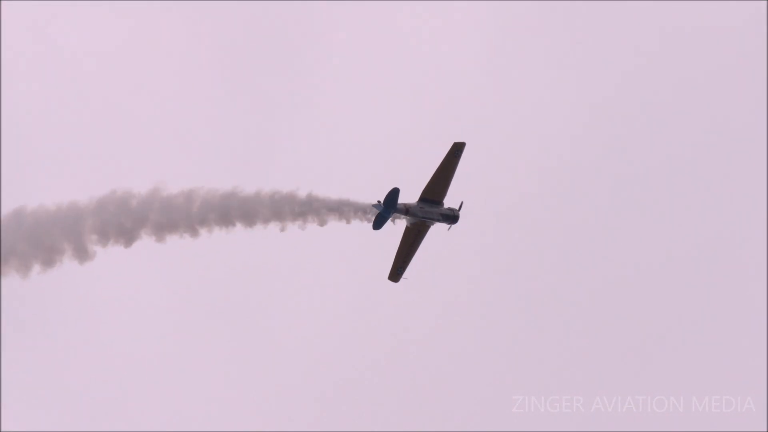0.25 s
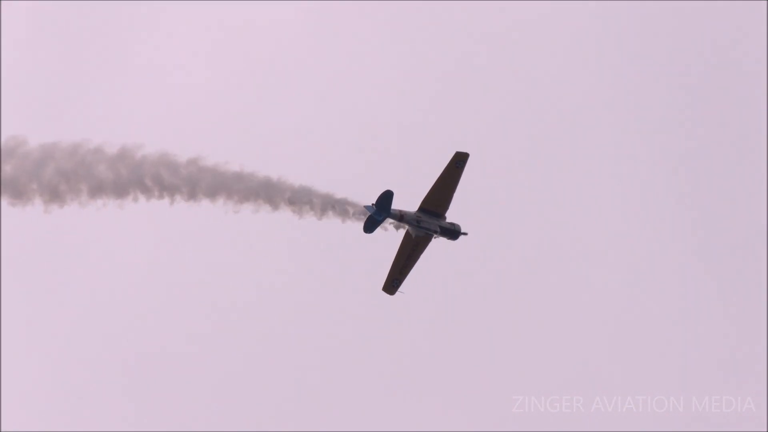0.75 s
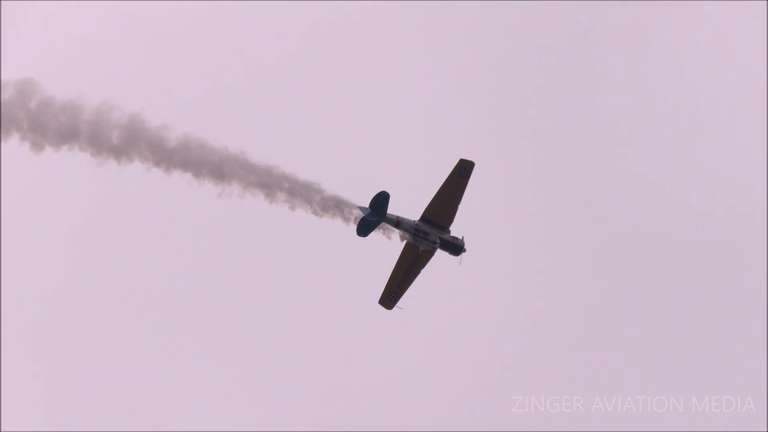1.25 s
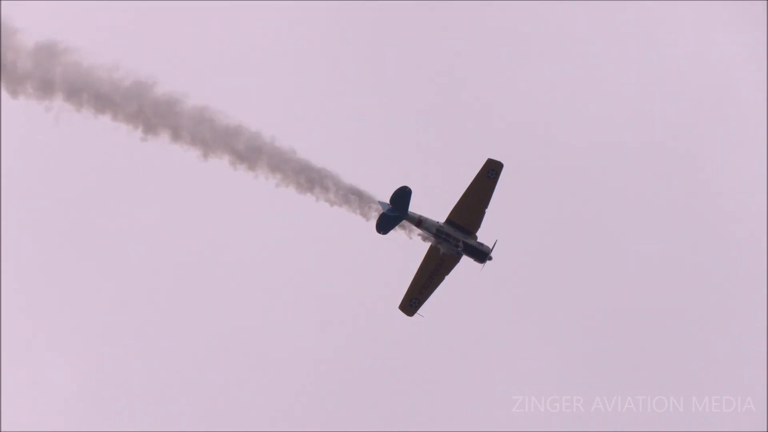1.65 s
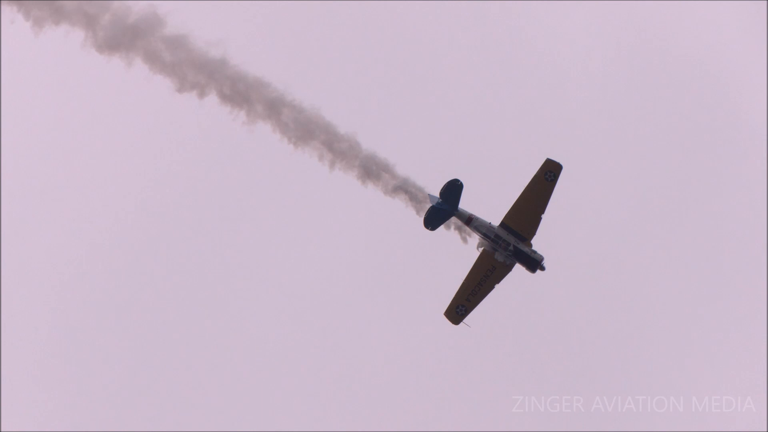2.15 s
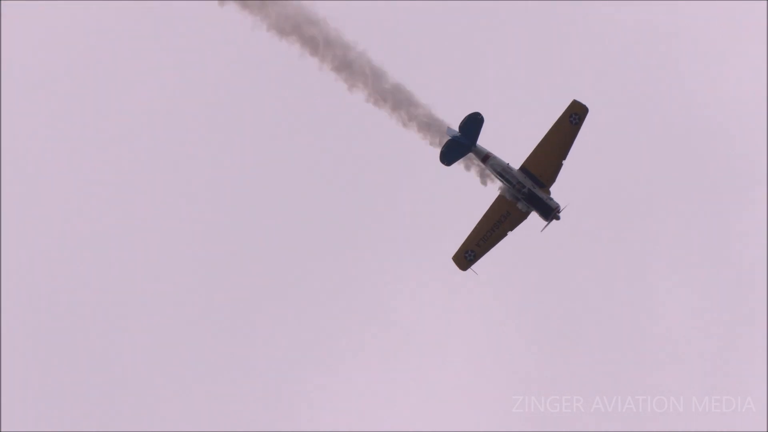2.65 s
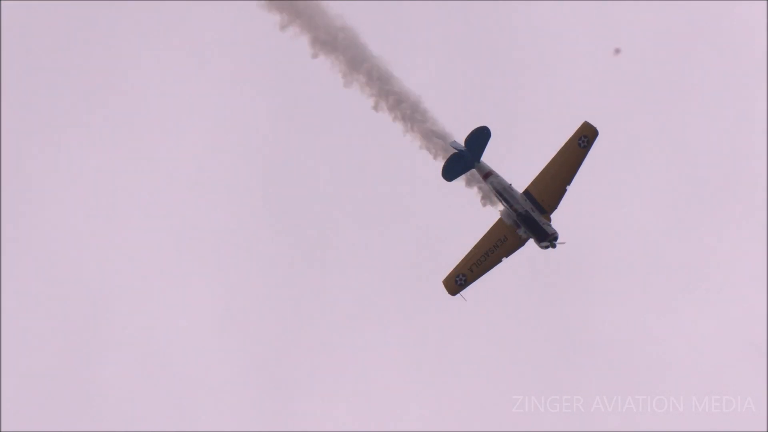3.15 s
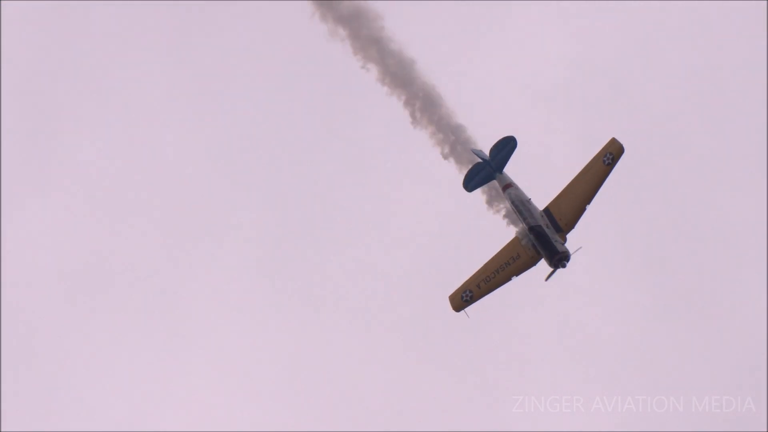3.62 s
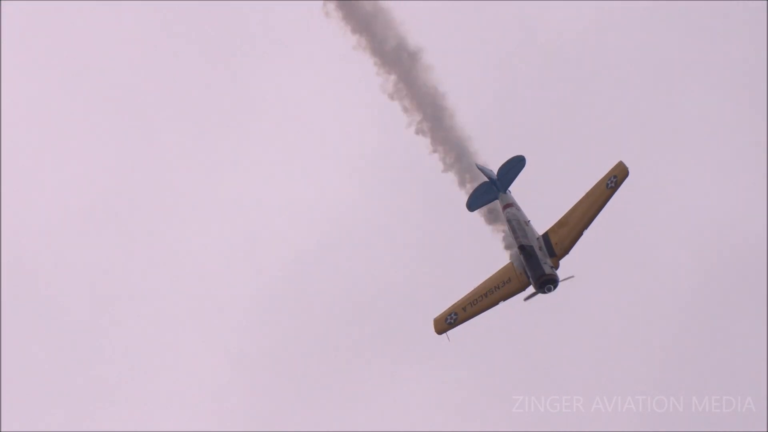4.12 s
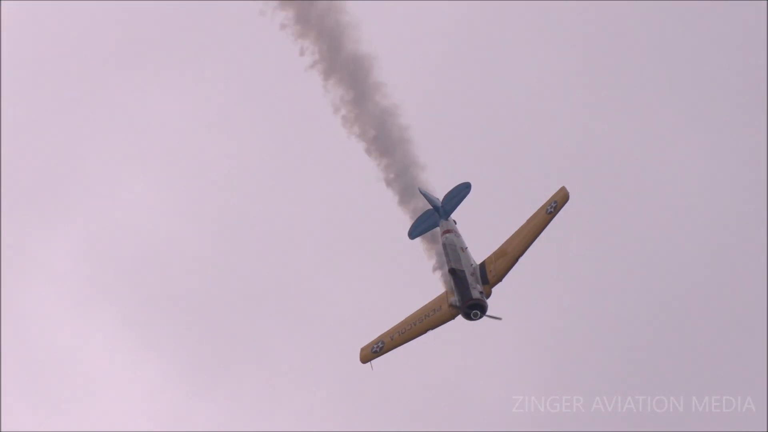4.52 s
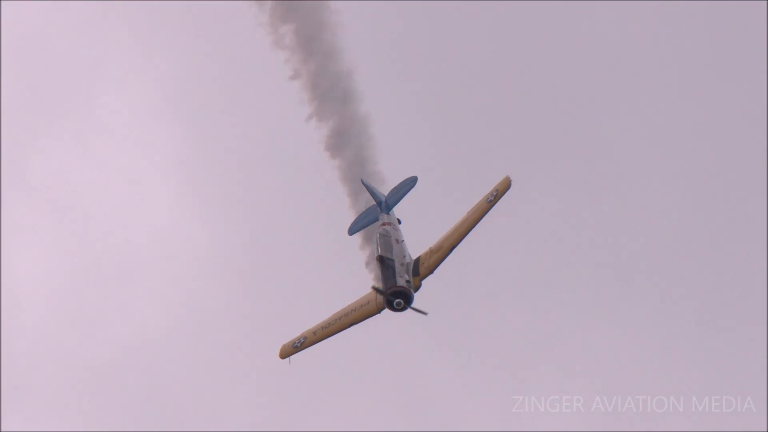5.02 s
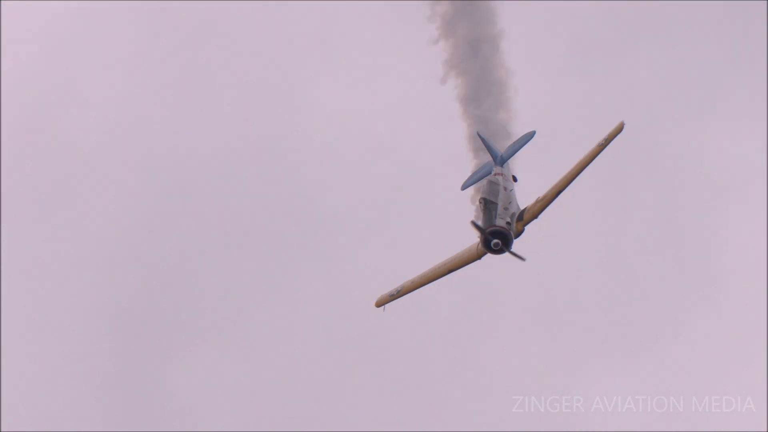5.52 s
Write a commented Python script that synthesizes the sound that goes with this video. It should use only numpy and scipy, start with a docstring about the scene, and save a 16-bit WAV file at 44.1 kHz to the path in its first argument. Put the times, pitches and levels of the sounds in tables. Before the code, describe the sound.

A single-engine propeller aircraft passes over a grass field. A few soft low thumps open over throbbing exhaust, then an airy, snarling whoosh swells and sinks. A deep hum builds, and the propeller takes over with fast, increasingly sharp cracks, loudest past the middle, slowly rising in pitch. Faint insects trill and microphones hiss underneath. Distant outdoor stereo pickup with thin deep bass and softened top treble.

```python
"""An aircraft's exhaust throbs first, over a few low thumps, trilling insects in the grass and microphone hiss.
The aircraft, with nine cylinders in a ring and a two-blade propeller, banks and dives towards a listener on a
grass airfield. Tones, filtered noise and puffs make the exhaust. As the propeller disc turns edge-on, the blade
tips crack in pairs: a steep pulse through the air, then another off the ground."""
import sys
import numpy as np
from scipy import signal
from scipy.fft import rfft, irfft, next_fast_len
from scipy.io import wavfile
from scipy.ndimage import uniform_filter1d, map_coordinates

SR = 44100
rng = np.random.default_rng(int(sys.argv[2]) if len(sys.argv) > 2 else 0)


def bounce(signal):
    """Save signal as a 16-bit WAV file at the path given by the first command-line argument."""
    frames = np.transpose(np.atleast_2d(signal))
    limited = np.clip(frames, -1, 1)
    pcm = np.round(limited * 32767).astype(np.int16)
    wavfile.write(sys.argv[1], SR, pcm)


N = 254581


def amp(db):
    """Turn decibels into a plain multiplier."""
    return np.exp(np.asarray(db) * (np.log(10) / 20))


def unit(x):
    """Scale a signal to an rms of 1."""
    return x / np.sqrt(np.mean(x ** 2) + 1e-20)


def curves(rows):
    """One value per sample for each column after the time."""
    s, *cols = np.transpose(rows)
    return [np.interp(np.arange(N) / SR, s, c) for c in cols]


def since(at_s):
    """Seconds after a moment, 0 before it."""
    return np.clip(np.arange(N) / SR - at_s, 0, None)


def swell(at_s, width_s):
    """A bell of height 1 in time."""
    return np.exp(-((np.arange(N) / SR - at_s) / width_s) ** 2)


def turn_on(at_s, rise_s):
    """A smooth step from 0 to 1."""
    return .5 + .5 * np.tanh((np.arange(N) / SR - at_s) / rise_s)


def wobble(rate):
    """A smooth random curve, rate knots a second."""
    coarse = np.arange(0, N + 64, 64)
    knots = rng.standard_normal(int(N * rate / SR) + 4)
    return np.interp(np.arange(N), coarse, map_coordinates(knots, [coarse * rate / SR]))


def filtered(x, response):
    """x times a complex response of frequency."""
    m = next_fast_len(N + SR // 2)
    return irfft(rfft(x, m) * response(np.fft.rfftfreq(m, 1 / SR)), m)[..., :N]


def band(hz, centre_hz, width_hz):
    """One causal resonance."""
    return 1j * hz * width_hz / (centre_hz ** 2 - hz ** 2 + 1j * hz * width_hz)


def noise(spectrum, patchy_db, channels=1):
    """Coloured noise of rms 1 with patches of random gain."""
    z = signal.stft(rng.standard_normal((channels, N)), nperseg=512)[2]
    field = uniform_filter1d(rng.standard_normal(z.shape[1:]), 6, 0)
    field = uniform_filter1d(field, 14, 1)
    patchy = signal.istft(z * amp(patchy_db * unit(field)), nperseg=512)[1][:, :N]
    f, db = np.transpose(spectrum)
    return unit(filtered(patchy, lambda hz: amp(np.interp(np.log(hz + 1), np.log(f), db))))


# How fast the blades pass, as heard. Each row: time in seconds, blade passes per second in Hz.
BLADE_RATE = [(0.0, 62.08), (0.4, 62.43), (0.8, 62.92), (1.2, 63.65), (1.6, 64.18), (2.0, 64.9),
              (2.4, 65.81), (2.8, 66.64), (3.2, 67.36), (3.6, 68.16), (4.0, 69.25), (4.4, 70.41),
              (4.8, 71.71), (5.2, 73.09), (5.77, 75.3)]


def blade_passes():
    """The pitch curve in Hz, and the running count of blade passes, which sets every repeating sound."""
    rate, = curves(BLADE_RATE)
    return rate, np.cumsum(rate) / SR


# Loudness of the low sounds. Each row: time in seconds, then the levels in dB of the thrust hum,
# the firing tone, the throb and the rumble.
LOW_LEVELS = [(0, -43.5, -33.5, -38.5, -35), (.45, -41, -53, -33.5, -30), (1.3, -32, -46, -31.5, -32),
              (2.0, -31, -42, -32, -34.5), (2.6, -28, -43.5, -27.5, -31.5), (3.0, -30.5, -39, -27, -35),
              (3.55, -29.5, -52, -27, -33), (4.1, -44, -51.5, -31, -36), (4.55, -56, -41, -47, -37),
              (5.1, -48, -54, -44, -30.5), (5.45, -40.5, -34, -39.5, -33.5), (5.77, -41, -39, -30.5, -29)]


def low_levels():
    """Levels of the low sounds, as curves in dB."""
    return curves(LOW_LEVELS)


CYCLE_MS = 62.5  # nominal engine cycle: lags in ms are counted as shares of it, so they shrink as the engine quickens

# The cylinders in firing order. Each row: lag of the puff in the collector ring in nominal ms, strength in dB.
CYLINDERS = [(-3.7, -1), (-3.3, -4), (-1.6, -2), (-6.4, -1.5), (-1.1, -4), (-3.1, -6), (1.3, -3), (5, -5),
             (5.1, 0)]


def puff_maker(cycle):
    """Nine puffs every cycle (two turns), unevenly spaced by the collector ring, each a click to be filtered."""
    lag, db = np.transpose(CYLINDERS)
    cycle_numbers = np.arange(-1, int(cycle[-1]) + 1)[:, None]
    fired = cycle_numbers + np.arange(9) / 9 + lag / CYCLE_MS
    chance = rng.standard_normal((fired.size, 2))
    at = np.interp(fired.ravel(), cycle, np.arange(N), left=-1, right=-1)
    size = np.tile(db, len(fired))

    def puffs(scatter_ms, scatter_db):
        """Place the clicks with random shifts in time and level."""
        where = np.round(at + scatter_ms * chance[:, 0] * SR / 1000)
        where = np.clip(where, 0, N - 1).astype(int)
        return -np.bincount(where, (at > 0) * amp(size + scatter_db * chance[:, 1]), N)

    return puffs


def tones(table, cycle, drift, flicker_db):
    """Tones lined up to dip together near the strongest puff of the cycle; the air makes each one waver."""
    from_puff = cycle - 15 / 16
    total = 0
    for multiple, level in np.asarray(table, float):
        loudness = amp(level + flicker_db * wobble(4.67))
        total = total + loudness * np.cos(2 * np.pi * multiple * from_puff + drift * wobble(4))
    return -np.sqrt(2) * total


# Low and higher exhaust tones. Each row: multiple of the engine cycle rate, relative level in dB.
THROB = [(5, -23), (6, -21), (7, -22), (10, -23.5), (11, -1.5), (13, -33), (15, -20.5), (17, -31),
         (18, -24.5)]
SNARL = [(21, -10), (22, 0.5), (23, -2), (24, -14.5), (26, -10), (27, -1.5), (28, -3), (29, -14),
         (30, -15.5), (32, -4.5), (33, -3.5), (34, -1), (35, -3.5), (37, -18.5), (38, -3.5), (39, -3.5),
         (40, -4), (43, -18), (44, -9), (45, -17), (49, -13.5)]


def exhaust_tones(cycle, firing_db, throb_db, snarl_db):
    """The repeating puffs heard as steady tones: nine firings a cycle, the throb and the snarl."""
    firing = amp(firing_db) * tones([(9, 0.078)], cycle, 0.26, 0.45)
    throb = amp(throb_db) * tones(THROB, cycle, 0.15, 0.21)
    snarl = amp(snarl_db) * tones(SNARL, cycle, 0.86, 3.9)
    return firing + throb + snarl


def exhaust_bark(puffs):
    """Sharp puffs ring at about 820, 910 and 1500 Hz."""
    def ring(hz):
        resonances = 0.92 * band(hz, 910, 250) + band(hz, 820, 320) + 0.24 * band(hz, 1500, 1000)
        return resonances * hz / (hz + 400) * np.exp(-(hz / 2600) ** 2)
    return unit(filtered(puffs(0.2, 0.77), ring))


# Colours of the exhaust's rushing noise and low rumble. Each row: frequency in Hz, relative level in dB.
RUSH = [(300, -29.5), (580, 2.5), (740, -0.5), (1000, 1), (1600, -5.5), (2600, -13), (4500, -22),
        (6500, -38.5), (9000, -68)]
RUMBLE = [(30, -7.5), (60, -7), (110, -6), (180, -3.5), (300, -9), (500, -13.5), (800, -32), (1500, -52.5)]


def exhaust_roar(puffs, rush_db, rumble_db):
    """Rushing noise that grows a little with every puff, over a steady rumbling noise."""
    gate = unit(np.abs(filtered(puffs(.3, 11.0), lambda hz: 1 / (1 + 1j * hz / 90) ** 2)))
    rush = unit((2.4 + .5 * gate) * noise(RUSH, 1.4)[0])
    return amp(rush_db) * rush + amp(rumble_db) * noise(RUMBLE, 0.33)[0]


# Swells of an airy whoosh. Each row: peak time in seconds, width in seconds, level in dB, pitch at the peak in Hz,
# glide in Hz per second (below 0 sinks), share of the narrow noise from 0 to 1.
WHOOSH = [(.45, 0.27, -35, 1060, -80, 0.63), (.45, 0.53, -35, 760, -100, 0.24),
          (3.35, 0.44, -40.5, 860, -120, 0.73), (0.71, .2, -45.5, 1500, -1300, 0.7),
          (0.87, .2, -57, 1700, -600, 0.3), (.52, 0.15, -50, 2300, -200, 0.14),
          (1.4, .11, -55, 2600, -2400, 0), (1.3, .2, -52, 1500, -500, 0.1),
          (1.1, 0.12, -54, 1000, -300, .4), (1.75, .2, -54, 1800, -100, .5),
          (2.05, 0.3, -54, 1700, -300, 0.5), (2.0, 0.16, -63, 1150, -200, .3),
          (2.35, 0.22, -46, 940, -100, 0.8), (3, 0.089, -55, 1500, 900, 0.1),
          (2.4, 0.15, -47, 1250, -100, 0.2), (2.8, 0.37, -53, 1200, -100, 1)]


def whoosh():
    """Slow noise times a gliding tone gives a soft band of air that mostly sinks in pitch."""
    def slow_noise(top_hz):
        return unit(filtered(rng.standard_normal(N), lambda hz: np.exp(-(hz / top_hz) ** 2)))

    narrow, wide = slow_noise(80), slow_noise(380)
    time_s = since(0)
    total = 0
    for s, width, db, hz, glide, thin in WHOOSH:
        air = thin * narrow + (1 - thin) * wide
        tone = np.sin(2 * np.pi * (hz + glide * (time_s / 2 - s)) * time_s)
        total = total + air * amp(db) * swell(s, width) * tone
    return np.sqrt(2) * amp(1.2 * wobble(20)) * total


# The exhaust outlet sweeps past the listener: peak time, width after it and before it in seconds, then boosts in dB
OUTLET_S, OUTLET_WIDTH_S, OUTLET_COMING_S = 0.55, 0.27, 0.25
OUTLET_RUSH_DB, OUTLET_BARK_DB, OUTLET_SNARL_DB = 8, 20.5, 19.5
SNARL_LINGERS = 2.95  # the snarl's swell is this many times wider
# louder as the nose swings round
NEAR_S, NEAR_RISE_S, NEAR_RUSH_DB, NEAR_BARK_DB, NEAR_SNARL_DB = 2.99, 0.8, 1.5, 17.5, 7
AWAY_S, AWAY_DB_PER_S = 5.62, 30  # bark and snarl fade at the end
RUSH_DB, BARK_DB, SNARL_DB = -46, -61.5, -58.5  # before these boosts and the fade
LEAD_MS_PER_S = 0.579  # the exhaust gains this many nominal ms on the blades each second


def exhaust():
    """Puffs of burnt gas make steady low tones, a sharp bark and a roar that pulses with the puffs."""
    _, firing_db, throb_db, rumble_db = low_levels()
    width_s = np.where(since(OUTLET_S) > 0, OUTLET_WIDTH_S, OUTLET_COMING_S)
    outlet = swell(OUTLET_S, width_s)
    snarl_outlet = swell(OUTLET_S, SNARL_LINGERS * OUTLET_WIDTH_S)
    near = turn_on(NEAR_S, NEAR_RISE_S)
    away_db = AWAY_DB_PER_S * since(AWAY_S)
    rush_db = RUSH_DB + OUTLET_RUSH_DB * outlet + NEAR_RUSH_DB * near
    bark_db = BARK_DB + OUTLET_BARK_DB * outlet + NEAR_BARK_DB * near - away_db
    snarl_db = SNARL_DB + OUTLET_SNARL_DB * snarl_outlet + NEAR_SNARL_DB * near - away_db
    cycle = blade_passes()[1] / 4 + LEAD_MS_PER_S * since(0) / CYCLE_MS  # four blade passes in two turns
    puffs = puff_maker(cycle)
    bark = off_ground(amp(bark_db) * exhaust_bark(puffs), 0.043)
    steady = exhaust_tones(cycle, firing_db, throb_db, snarl_db)
    return steady + whoosh() + bark + exhaust_roar(puffs, rush_db, rumble_db)


# Insect loudness. Each row: time in seconds, level in dB.
INSECTS = [(0, -69.5), (3.4, -65.5), (4.2, -70.5), (5.2, -68), (5.77, -62.5)]
# Colour of the microphone hiss. Each row: frequency in Hz, relative level in dB.
HISS = [(500, -30.5), (800, -16.5), (1300, -4), (2200, -1), (4000, -4.5), (5500, -13.5), (7500, -10.5),
        (9200, -15), (10500, -23), (13000, -22.5), (15700, -29)]
HISS_DB = -59


def grass():
    """Insects trill about nineteen times a second from all sides; each microphone hisses on its own."""
    insect_db, = curves(INSECTS)
    beat = np.cumsum(19.0 + .5 * wobble(0.97)) / SR
    trill = (3.7 + np.cos(2 * np.pi * beat)) * amp(1.0 * wobble(5.5))
    a, b = filtered(rng.standard_normal((2, N)),
                    lambda hz: band(hz, 8340, 200) ** 2 + .5 * band(hz, 8680, 150) ** 2)
    insects = unit(trill * np.array([a + b, a - b]))
    return amp(insect_db) * insects + amp(HISS_DB) * noise(HISS, 0.89, channels=2)


THUMP_WIDTH_S = 0.011

# Low thumps at the start. Each row: time in seconds, peak level in dB, pitch in Hz.
THUMPS = [(0.029, -19, 152), (0.046, -12.5, 127), (0.09, -19.5, 120), (0.117, -17.5, 137),
          (0.149, -21, 116), (0.186, -25, 139), (.21, -23, 120), (0.227, -25, 117), (0.28, -25, 119),
          (0.308, -26, 139), (0.354, -23, 131), (0.401, -24, 95)]


def thumps():
    """Short low booms near 120 Hz, each a tone inside a brief bell; they become weaker."""
    return sum(amp(db) * swell(s, THUMP_WIDTH_S) * np.cos(2 * np.pi * hz * (since(0) - s))
               for s, db, hz in THUMPS)


OCTAVE_DB, OCTAVE_S, OCTAVE_WIDTH_S, OCTAVE_SWELL_DB = -49.5, 3.89, 0.73, 17.2  # second tone and its swell
DRONE_S, DRONE_WIDTH_S, DRONE_DB = 1.71, 1.1, -38.5  # swell of the fourth tone


def thrust_hum(passes):
    """The push of each passing blade hums at one, two and four times the blade rate."""
    octave_db = OCTAVE_DB + OCTAVE_SWELL_DB * swell(OCTAVE_S, OCTAVE_WIDTH_S)
    hum = amp(low_levels()[0]) * np.sin(2 * np.pi * (passes + 0.33))
    octave = amp(octave_db) * np.sin(4 * np.pi * (passes - .1))
    drone = amp(DRONE_DB) * swell(DRONE_S, DRONE_WIDTH_S) * np.sin(4 * 2 * np.pi * passes - .15)
    return np.sqrt(2) * amp(.4 * wobble(3)) * (hum + octave + drone)


# Weak paths over uneven ground. Each row: lag after the ground front in ms, wander in ms,
# changes per second, share (below 0 is upside down).
SCATTER = [(.2, .1, 11, -.13), (.5, .2, 9, .14), (.9, .25, 8, -.11)]


def ground_scatter(after, late, steep):
    """Uneven ground sends small rounded bumps just after the ground front."""
    total = 0
    for lag, wander, often, part in SCATTER:
        bump = np.exp(-(after(late + lag + wander * wobble(often)) / (0.86 * steep)) ** 2)
        total = total + part * amp(3.3 * wobble(often)) * bump
    return total


RISE_SHARE = 0.39  # front rise over pulse length
# for a while every fourth front, one an engine cycle, is steeper
FOURTH_S, FOURTH_WIDTH_S, FOURTH_DB = 3.75, .25, 5
SECOND_MS, SECOND_TOP_HZ = 1.776, 870  # the dull second arrival: delay, treble loss

# Blade tips as the disc turns edge-on. Each row: time in seconds, pulse level in dB, pulse length in ms,
# overpressure length over suction length, ground pulse length over direct length, delay off the grass in ms,
# share of the dull second arrival.
TIPS = [(0, -65, 1.6, 1, 0.9, 2.9, 0.74), (.7, -36.5, 1.7, 0.8, 0.95, 3.7, 0.55),
        (1.8, -28, 1.9, 0.72, 0.77, 3.56, 0.67), (2.2, -25, 1.8, 0.71, 0.82, 3.9, 0.58),
        (2.6, -26, 1.8, 1.2, 0.67, 3.5, 0.47), (2.9, -22, 1.43, 1.76, 0.69, 3.44, 0.42),
        (3.1, -20.5, 1.09, 1.4, 0.63, 3.32, 0.33), (3.3, -20, 1.1, 1.5, 0.45, 3.26, 0.41),
        (3.5, -19, 1.3, 1.3, 0.62, 3.34, 0.66), (3.7, -17.5, 0.9, 1.7, 0.64, 3.3, 0.45),
        (4, -17, 0.78, 1.26, 0.73, 3.24, 0.2), (4.2, -16.5, 0.58, 1.38, 0.81, 3.3, .05),
        (4.4, -19, 0.57, 1.3, 0.86, 3.11, .02), (4.6, -19, 0.71, 1.03, 0.64, 3.04, 0.19),
        (4.8, -19, 0.68, 0.97, 0.74, 2.99, .1), (5, -19.5, 0.45, 2.24, 0.91, 3.05, 0.036),
        (5.2, -19.5, 0.52, 1.8, 0.66, 2.99, 0.009), (5.35, -20, 0.5, 1.9, 0.9, 2.92, .01),
        (5.5, -21.5, 0.69, 1.1, 0.46, 2.78, 0.052), (5.77, -26, 0.78, 1.56, 0.63, 2.68, .2)]
# The pulse off the grass, its front split in two steps by turbulence. Each row: time in seconds, level over the
# direct pulse in dB, typical rise of the first step in ms, typical rise of the later step in ms,
# typical gap between the steps in ms, share of the later step.
GRAZE = [(0, 5, 1.1, 1.3, 0.24, .05), (2.6, 4.5, 2.1, 1.2, 0.32, .05), (2.9, 0.5, 1.4, 1.4, .3, .05),
         (3.2, 1, 0.67, 1.1, 0.93, 0.24), (3.5, 8, 0.17, 1.4, 0.6, 0.72),
         (3.7, 9.5, 0.16, 2.35, 0.23, 0.83), (4, 10, 0.15, 1.7, 0.35, 0.81), (4.1, 11, 0.12, 2, 0.13, 0.71),
         (4.2, 11, 0.088, 1.14, 0.072, 0.78), (4.3, 3.5, 0.086, 0.054, 0.12, 0.52),
         (4.43, 4, 0.092, 0.13, 0.21, 0.72), (4.52, 7, 0.063, 0.21, 0.26, 0.75),
         (4.62, 6.5, 0.066, 0.23, 0.41, 0.59), (4.76, 6.5, 0.077, 0.15, 0.34, 0.53),
         (4.87, 5, 0.075, 0.099, 0.22, 0.82), (4.95, 4.5, 0.08, 0.12, 0.12, 0.29),
         (5.1, 5, 0.065, 0.16, 0.053, 0.12), (5.18, 5.5, 0.062, 0.08, 0.24, 0.41),
         (5.29, 5, 0.051, 0.13, 0.21, 0.14), (5.4, 2.5, 0.091, 0.18, 0.26, 0.19),
         (5.5, 5, .12, 0.17, 0.45, 0.45), (5.77, 2, 0.27, 0.62, 0.054, 0.17)]


def propeller():
    """Each blade tip sends a suction, a steep front and an overpressure, through the air and off the grass."""
    rate, passes = blade_passes()
    passes = passes - .225
    db, length, push, stretch, delay, second = curves(TIPS)
    ground_db, graze, later, split, share = curves(GRAZE)
    fourth = swell(FOURTH_S, FOURTH_WIDTH_S) * np.cos(np.pi / 4 * (passes - 1.23)) ** 4
    side = np.cos(np.pi * passes + .3)  # the two blades are not quite alike

    def after(lag_ms):
        """Time in ms from the nearest front."""
        return ((passes - lag_ms * rate / 1000 + .5) % 1 - .5) * 1000 / rate

    def pulse(lag_ms, front_ms, length, split=0, share=0, later_ms=1, blunt=1.92, suck=1.07):
        """Suction before the front, overpressure after it."""
        u = after(lag_ms)
        push_side = np.clip(u - split, 0, None) / (push * length)
        fall = np.exp(-np.where(u > 0, push_side, -u / (suck * length)) ** blunt)
        first_step = np.tanh(u / np.clip(front_ms, .04, 3))
        front = (1 - share) * first_step + share * np.tanh((u - split) / later_ms)
        return 1.514 * front * fall * (1 + front_ms / length)

    steep_change_db = (.4 + 3.5 * np.clip(graze, 0, .4)) * wobble(60) - FOURTH_DB * fourth
    steep = graze * amp(steep_change_db)  # rise time in ms
    direct_rise = RISE_SHARE * length * amp(0.27 * wobble(26))
    direct = pulse(0.01 * wobble(25), direct_rise, length, blunt=3.5, suck=1)
    direct = amp(0.078 * wobble(30)) * direct
    late = delay + 0.0075 * wobble(25)
    ground = pulse(late, steep, stretch * length, split=np.abs(split) * amp(0.88 * wobble(30)),
                   share=np.clip(share, 0, 1), later_ms=np.clip(later * steep / graze, .04, 3))
    scatter = (1 - np.clip(share * later, 0, .9)) * ground_scatter(after, late, steep)
    ground_gain = amp(ground_db + 0.17 * wobble(30))
    cracks = amp(db + 0.089 * side) * (direct + ground_gain * (ground + scatter))

    def dull_path(hz):
        return np.exp(-2j * np.pi * hz * SECOND_MS / 1000) / (1 + (hz / SECOND_TOP_HZ) ** 2)

    def close_echo(hz):
        return band(hz, 1100, 2300) * np.exp(-2j * np.pi * hz * 0.00083)

    cracks = cracks + filtered(second * cracks, dull_path)
    # something close to the microphones throws each front back about a millisecond later
    cracks = cracks + 0.18 * filtered(cracks, close_echo)
    # air pushed aside by thin tips carries no bass
    cracks = filtered(cracks, lambda hz: 1 / (1 + (105 / (hz + 1)) ** 8))
    return cracks + thrust_hum(passes)


def off_ground(x, share):
    """x plus its copy off the grass, with the same changing delay as the blade pulses."""
    n = np.arange(N)
    return x + share * np.interp(n - curves(TIPS)[4] * SR / 1000, n, x)


def scene():
    """The aircraft heard through the air, with the thumps, insects and hiss added."""
    # hundreds of metres of air soak up the aircraft's top treble
    aircraft = filtered(exhaust() + propeller(), lambda hz: amp(-(hz / 6000) ** 6 * 1.6))
    return aircraft + thumps() + grass()


TOP_HZ = 15720


def record(dry):
    """The microphones cut the deep bass steeply and nothing passes above the band limit."""
    def microphone(hz):
        gentle_cut = (1j * hz / (1j * hz + 30)) ** 2
        return (hz < TOP_HZ) * gentle_cut / (1 + (52 / (hz + 1)) ** 8)
    return filtered(dry, microphone)


dry = scene()
out = record(dry)
bounce(out)
```